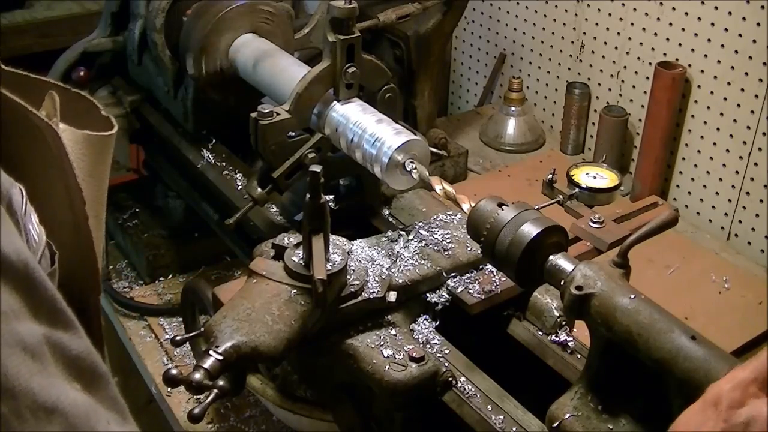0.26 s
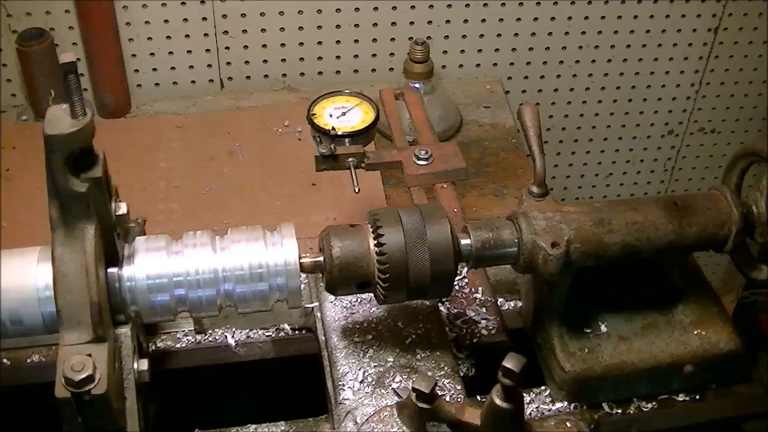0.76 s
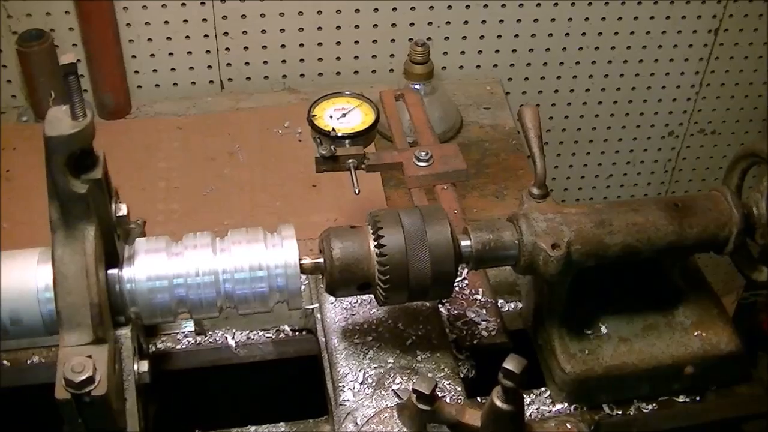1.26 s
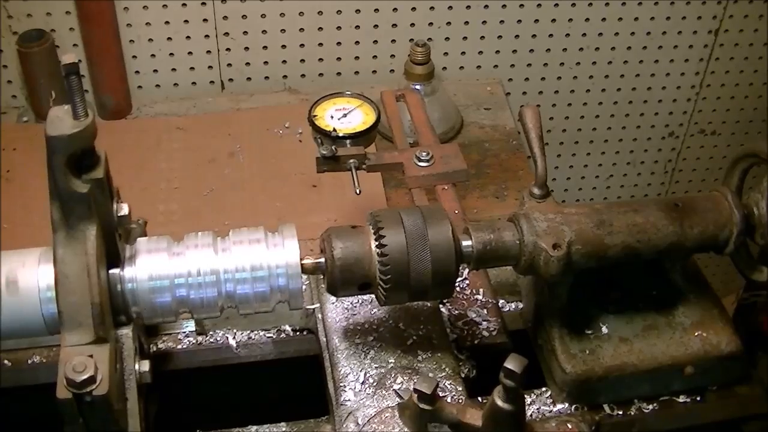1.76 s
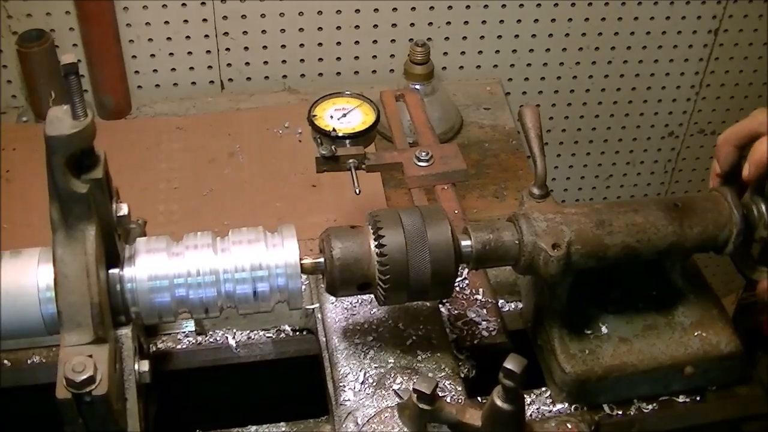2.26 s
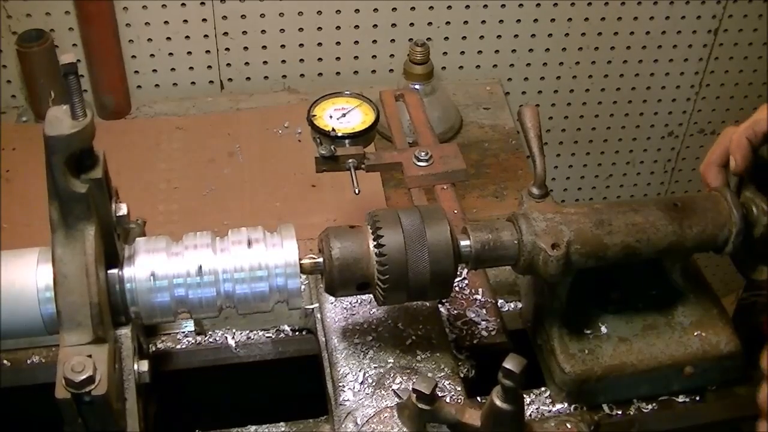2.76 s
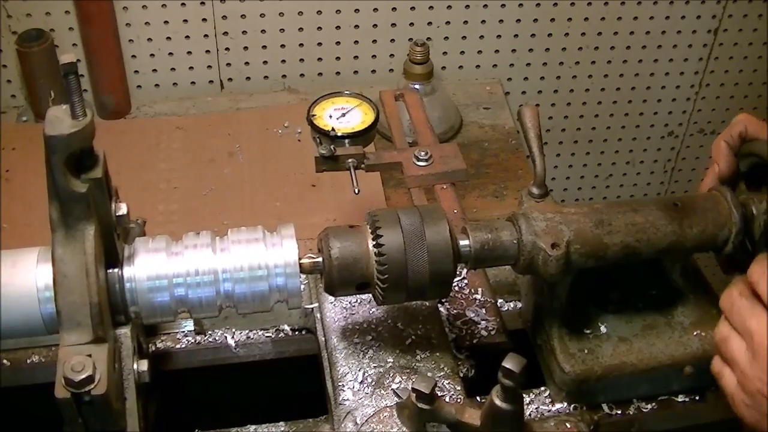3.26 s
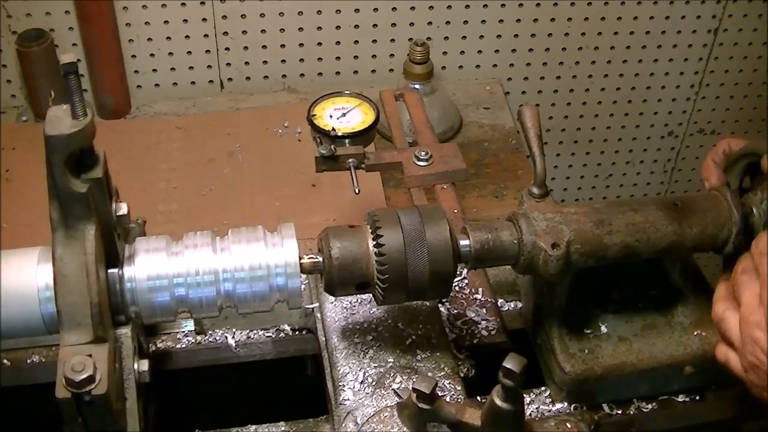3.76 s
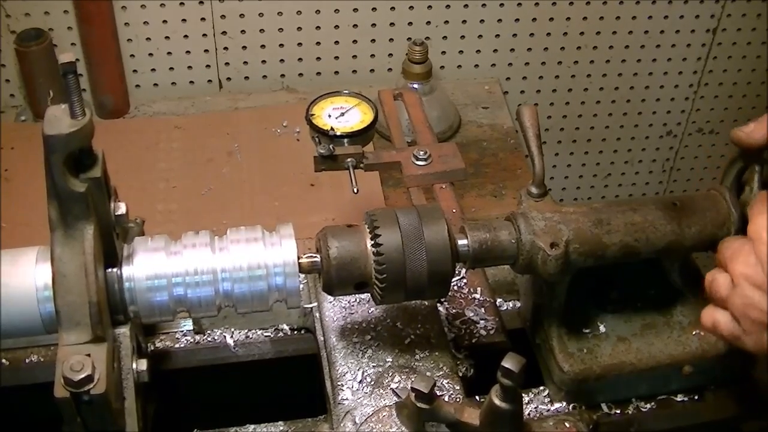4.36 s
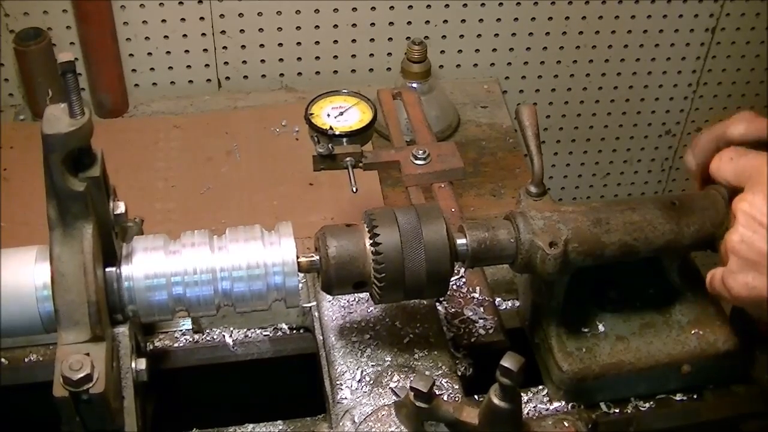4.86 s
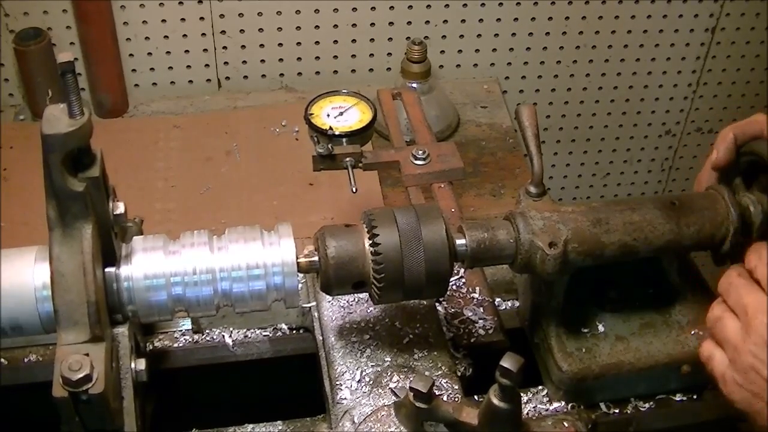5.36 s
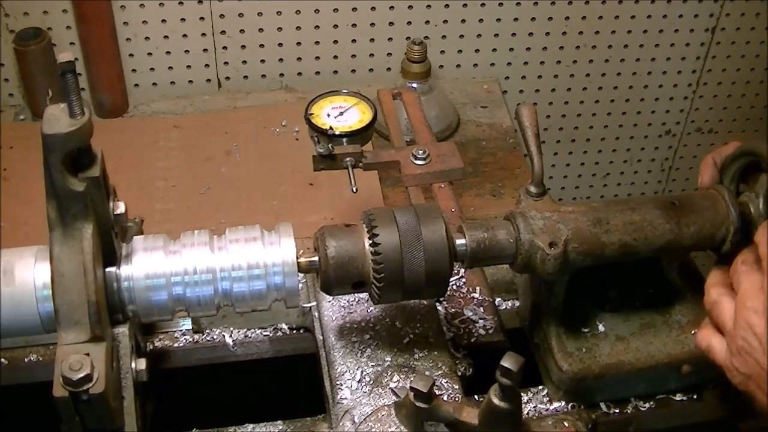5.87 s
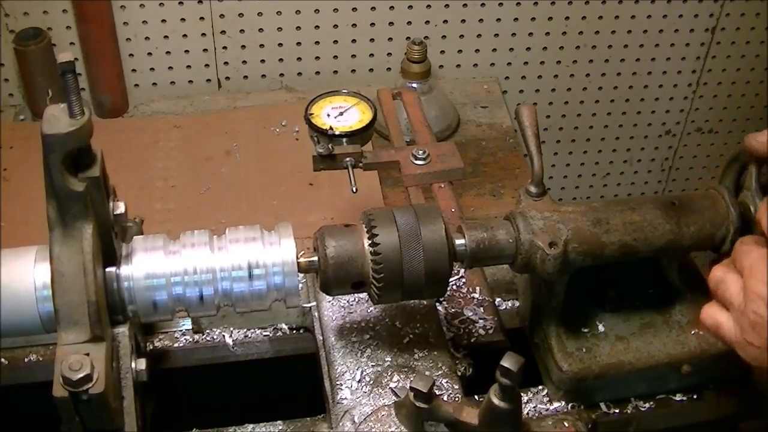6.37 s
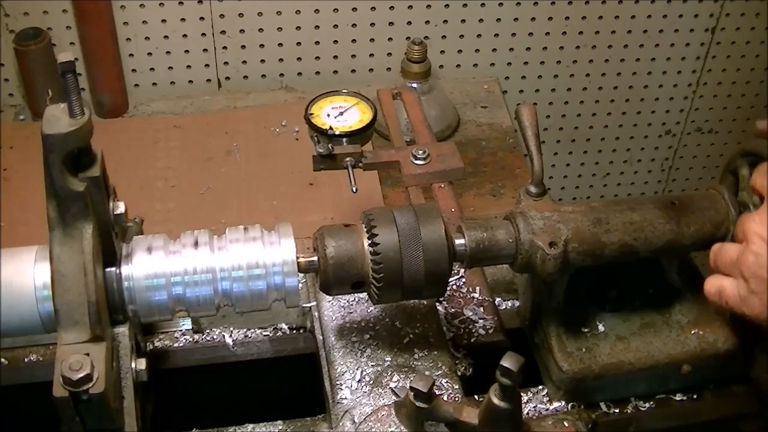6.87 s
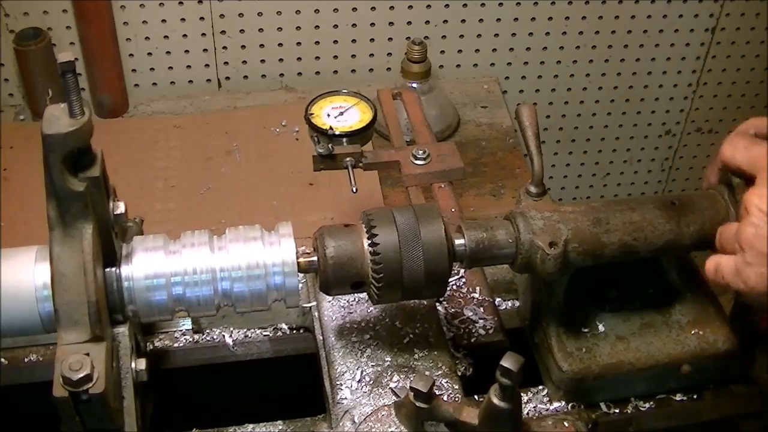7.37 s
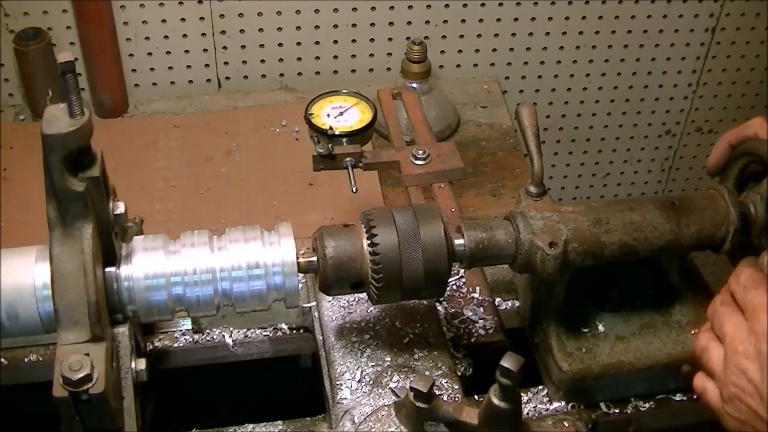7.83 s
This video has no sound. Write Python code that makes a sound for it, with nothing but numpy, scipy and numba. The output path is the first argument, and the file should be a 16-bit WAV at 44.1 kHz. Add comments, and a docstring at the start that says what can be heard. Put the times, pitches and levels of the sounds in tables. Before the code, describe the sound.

First the headstock of a lathe: electrical hum and rattling gears throbbing with each turn. A clean cut leaves a brief silent gap. Then the tailstock: softer motor drone and whirr beneath a constant scatter of very short, shrill squeaks, sliding and uneven, from a drill boring spinning metal. They get louder and harsher as the bit bites, continuing to the end in a small, lightly echoing workshop, closely miked.

```python
"""A drill bit squeaks as it bores a metal bar in an old lathe: gliding near-sines stick, slip and ring in the room.
Two places are heard with a silent pause between. By the headstock, hum tones sit under noise-driven casting
resonances that swell once a turn. By the tailstock, duller gears, a groaning motor, a knock and swarf ticks
lie under the squeaks and their delay-line echo, and a gain control ducks the loud ones."""
import sys
import numpy as np
from scipy import signal
from scipy.fft import rfft, irfft
from scipy.io import wavfile
from scipy.ndimage import uniform_filter1d, minimum_filter1d
from numba import njit

SR = 44100
rng = np.random.default_rng(int(sys.argv[2]) if len(sys.argv) > 2 else 0)


def wrap_up_sound(samples):
    """Save the sound to the file named by the first command line argument, as 16-bit audio."""
    columns = np.atleast_2d(samples).T
    # keep every value between -1 and 1, then stretch to whole-number steps
    tamed = np.clip(columns, -1, 1)
    steps = np.round(tamed * 32767).astype(np.int16)
    wavfile.write(sys.argv[1], SR, steps)


N = 357210

# bit squeaks: [start t/s, length/ms, middle f/Hz, fall in f/Hz, level/dB before gain control]
SQUEAKS = [(1.058, 16, 4900, 81, -5), (1.083, 8.2, 4230, -400, -9), (1.144, 6.7, 7420, 350, -2),
           (1.149, 23, 8330, -42, -7.5), (1.164, 19, 5710, -42, -3.5), (1.18, 24, 8080, 78, -6),
           (1.2178, 10.8, 7830, -170, -5.5), (1.263, 19.7, 3480, 502, -6.5), (1.2939, 11, 6360, 395, -0.5),
           (1.308, 8.5, 6480, -150, 0.5), (1.3288, 13.7, 5230, 993, -3), (1.345, 14.3, 4540, 1276, -8),
           (1.4154, 8.8, 7500, -30, -3), (1.429, 24, 5870, 443, -2), (1.4493, 20, 7520, 1150, -6.5),
           (1.4809, 26, 8050, -200, -4), (1.537, 5.8, 5060, -330, -8.5), (1.5613, 8, 7210, 577, -2),
           (1.597, 19.5, 4860, 797, -4.5), (1.684, 16, 7940, -960, -2), (1.702, 14.6, 5740, 32, -6),
           (1.719, 17, 7520, 1340, -5.5), (1.756, 8.6, 7490, -150, -0.5), (1.784, 11, 4560, -250, -15),
           (1.806, 6.7, 4330, 900, -12.5), (1.8638, 25, 5490, 501, -10), (1.869, 26.4, 4245, 902, -8),
           (1.9026, 6.8, 7320, 1128.5, -4.5), (1.952, 40, 7860, -620, -10.5), (1.968, 25, 5660, 76, -2),
           (1.991, 4.7, 6830, 900, -0.5), (2.027, 24, 7170, -78, -10.5), (2.0728, 10, 4580, 1800, -13),
           (2.1183, 31, 7400, 745, 3), (2.132, 6.5, 5970, 300, -10), (2.16, 11, 4580, 598, -16),
           (2.1507, 9.3, 7700, 248, -0.5), (2.199, 43, 8160, 1100, -8.5), (2.2566, 14, 8750, -40, -11.5),
           (2.269, 26.5, 6360, 783, 1.5), (2.29, 15, 8300, -290, -2), (2.3692, 11, 6460, 1166, -8.5),
           (2.401, 30, 7460, 50, -0.5), (2.4225, 10.6, 7760, -40, 7), (2.441, 3.7, 6340, -220, 3.5),
           (2.5408, 6.8, 6680, 420, 0.5), (2.553, 9, 6400, -180, 3), (2.5687, 4.3, 6340, 287, 13),
           (2.576, 6.7, 5100, 399, -2), (2.627, 14, 6180, 177, -4.5), (2.7154, 10, 5600, -600, -1.5),
           (2.8079, 6.1, 8700, -300, -7), (2.898, 18, 5670, 405, 2), (2.953, 14, 5780, 230, -3.5),
           (2.955, 14, 4830, 1104, -6.5), (2.9991, 8.4, 7440, 680, 3.5), (3.0389, 10, 8000, -40, -0.5),
           (3.05, 9.4, 6510, 221, 4.5), (3.119, 13, 8070, 839, -6.5), (3.1575, 35, 5510, -200, -3.5),
           (3.181, 16.5, 7830, 179, 4), (3.231, 11, 5520, 900, -1), (3.2542, 7.4, 5950, 160, 0),
           (3.2846, 14, 7780, 30, -5.5), (3.3553, 8, 7500, 51, 7.5), (3.379, 12, 5760, 508, -13),
           (3.4304, 6.6, 5500, -240, -3), (3.446, 12.6, 6420, 340, 10), (3.4602, 21, 7860, -25, 7),
           (3.4777, 19, 5500, 489, 2.5), (3.5876, 20.6, 8360, -370, -3.5), (3.6576, 8.1, 6480, 830, -0.5),
           (3.6892, 11, 5800, 26, -9), (3.7232, 12, 6150, -100, 5.5), (3.778, 20.5, 5130, 1000, 1),
           (3.858, 21, 8640, 2, -21), (3.999, 10.7, 6250, 291, 5), (4.0526, 6.9, 6170, 1330, 8.5),
           (4.067, 12, 4730, 403, -10), (4.18, 5, 6400, 518, -12), (4.2214, 13, 8200, 800, -4),
           (4.259, 4.9, 5870, -130, 3), (4.2757, 6.7, 5130, 852, 2), (4.282, 32, 7860, -35, 0),
           (4.302, 25, 5895, 236, 4.5), (4.4174, 10, 8400, -120, -1.5), (4.485, 7, 5100, 900, -4),
           (4.495, 13, 8000, 50, 1.5), (4.563, 27, 8040, 400, -4), (4.6032, 5.8, 6230, 420, 11),
           (4.612, 12, 5170, 298, -6), (4.7724, 7.7, 6500, 900, -12), (4.8262, 12, 5350, 209, 1.5),
           (4.8355, 16.4, 7740, 322, 3), (4.8673, 8.3, 5890, 110, 5.5), (4.876, 12.5, 5170, 902, -3.5),
           (4.9146, 5.9, 6310, -450, 4), (5.0057, 7.8, 7820, -400, -10.5), (5.051, 15, 5720, 1000, -5),
           (5.0585, 21, 4510, 497.5, -10), (5.091, 5.5, 5280, 360, -3), (5.096, 30, 5930, -300, 1),
           (5.109, 17, 7100, 294, 7), (5.137, 6.7, 7280, 330, 1), (5.138, 10.5, 4860, 900, -9.5),
           (5.1773, 7.4, 8100, 40, -8), (5.188, 8.6, 6350, -80, 2.5), (5.239, 7.6, 6980, 415, 6.5),
           (5.278, 9, 7900, 100, -18), (5.3164, 8.6, 7080, 1100, -6.5), (5.353, 11.5, 4860, -210, -8),
           (5.373, 11.7, 5380, -64, -0.5), (5.388, 15, 7700, 100, -2.5), (5.3868, 9.1, 6290, -220, 3.5),
           (5.403, 32, 5950, 697, 3), (5.5148, 44, 7600, -1200, 6), (5.618, 9.6, 6100, 500, -11.5),
           (5.7059, 9.4, 5810, 1308.5, 0.5), (5.747, 10.4, 6600, 182, 9.5), (5.803, 22.6, 7660, 46, 6.5),
           (5.831, 8, 8180, -30, 4), (5.864, 6.5, 6500, 200, -9), (5.874, 19, 10480, 98, -14),
           (5.932, 2.8, 6100, 542, -6), (5.962, 9.6, 7550, 369, -7), (5.9896, 19.5, 5795, 27, -7.5),
           (6.08, 12.6, 6200, 308, -7), (6.1345, 7, 6240, -320, 9), (6.163, 3.7, 4090, 310, 0.5),
           (6.2028, 8.9, 7600, 85, 1.5), (6.2056, 9.3, 6240, 26, 11.5), (6.249, 15, 6020, 300, 0.5),
           (6.263, 11, 5320, 901, -7), (6.321, 30, 8070, 471, -9.5), (6.344, 10.4, 7930, 535, -0.5),
           (6.402, 13, 5850, -140, 0), (6.424, 7.1, 7190, 364, 1), (6.465, 17.4, 4950, -600, -6.5),
           (6.479, 11.5, 8190, 370, -7.5), (6.544, 9.9, 4885, 162, 1), (6.622, 29, 6930, 242, -17.5),
           (6.689, 7, 7540, 1368, -1), (6.828, 20, 5435, 8, -4.5), (6.9398, 8.4, 9140, 100, 1.5),
           (7.064, 6.9, 7500, 833, 7.5), (7.1055, 11.7, 5740, 500, -2.5), (7.1855, 27, 8490, -47, -6),
           (7.212, 31, 8110, 1552, -9), (7.225, 8.3, 6450, 1000, -6), (7.377, 15, 5680, 70, -6),
           (7.433, 53, 8390, -150, -5), (7.4964, 9.3, 7300, 2100, 3), (7.679, 11, 6600, -900, 4),
           (7.728, 12.7, 7440, 1591, 4.5), (7.764, 16, 8400, -600, -14), (7.8232, 11.6, 5510, 1500, -6),
           (7.928, 16.4, 4800, 900, -17.5), (8.015, 15, 7400, -200, -12), (8.025, 9.1, 7540, -350, 2.5),
           (8.0433, 7.1, 7980, -520, -2), (8.068, 7.7, 8900, 601.5, -12)]
# how hard the bit bites: [t/s, load 0-1]
LOAD = [(2.2, 0.25), (2.7, 0.95)]
# silence between the two places: [start t/s, end t/s]
PAUSE_S = (.6595, 1.052)
# motor hum by the headstock: [f/Hz, level/dB rms]
HUM_NEAR = [(120, -21), (240, -33.5)]
# motor hum by the tailstock: [f/Hz, level/dB rms before gain control]
HUM_FAR = [(119.95, -20), (479.8, -41)]
# gearbox casting resonances at each place: [f/Hz, width/Hz, relative level/dB]
CASTING_NEAR = [(381, 65, -7.5), (486.5, 17, 4), (782, 55, -8), (1110, 27, -13), (1330, 19, -7.5),
                (2410, 79, -17), (2715, 28, -12.5), (3340, 50, -22), (3890, 170, -24.5), (4370, 270, -22.5),
                (7190, 500, -27), (10000, 800, -24), (12600, 900, -24)]
CASTING_FAR = [(507.7, 38.5, 2.5), (806, 122, -8.5), (1224, 77, -7.5), (2077, 147, -11.5),
               (2760, 112, -12.5), (3286, 260, -15)]
# tight spots in the gears, met again every turn: [t/s, low-mode lift/dB, high-mode lift/dB]
TIGHT_SPOTS = [(0.17, -3, 11.5), (0.243, 4.5, 8), (0.29, 3, 4.5)]
# small knocks in the running machine: [t/s, envelope level/dB before gain control]
KNOCKS = [(6.728, -27)]
# spectrum of the broad whirr at each place: [f/Hz, relative level/dB]
WHIRR_NEAR = [(25, -64), (120, -21), (480, -17), (2500, -25.5), (6000, -43.5), (12500, -48), (16000, -62.5)]
WHIRR_FAR = [(25, -48), (120, -10), (500, -17), (1600, -21), (5000, -26), (11000, -32), (16000, -54)]
# base strength of a squeak's overtone by its own pitch: [f/Hz, level/dB]
OVERTONE = [(6000, 2.5), (11000, -10.5), (13500, -20), (16000, -30)]

TURN_HZ, TURN_PEAK_S = 3.76, 0.24  # spindle turns per second, moment of the swell
TIGHT_S, HIGH_MODES_HZ = 0.011, 2000  # width of a tight spot, split between low and high modes
KNOCK_S, KNOCK_HZ, KNOCK_WIDTH_HZ = 0.013, 1500, 2800  # decay time, resonance and its width
BUILD_FROM, BUILD_SHARE = 0.78, 0.25  # a slip starts at part strength and builds over this share of its length
STEADY_ROUGH, ROUGH_FALL_HZ = 0.43, 514  # roughness of a steady squeak, glide that adds 1 to it
GLIDE_BEND = 0.55  # under 1: the pitch moves fastest at the start of a slip
# gain control: start and top gain, climb time, ceiling, attack time, peak window, gain smoothing
START_DB, TOP_DB, CLIMB_S = -9.5, -0.5, 0.37
CEILING_DB, ATTACK_S, PEAK_HOLD_S, GAIN_SLEW_S = -9.5, 0.0016, 0.0015, 0.004
LOW_CUT_HZ, TOP_HZ = 20, 16000


def undb(db):
    """dB to gain."""
    return 10 ** (np.asarray(db) / 20)


def level(x, db):
    """Scale to an rms level in dB."""
    return x * undb(db) / np.sqrt(np.mean(x ** 2))


def walk(rate):
    """Random values held for 1 / rate s and smoothed twice; spread about 0.6."""
    hold = int(SR / rate)
    steps = np.repeat(rng.standard_normal(N // hold + 1), hold)
    return 0.83 * uniform_filter1d(uniform_filter1d(steps, hold), hold)[:N]


def spectrum_db(points, hz):
    """Straight lines between (f/Hz, level/dB) points on a log-frequency axis."""
    point_hz, point_db = np.array(points).T
    return np.interp(np.log(hz), np.log(point_hz), point_db)


def bin_hz():
    """Frequencies of the spectrum bins, kept above zero."""
    return np.maximum(np.fft.rfftfreq(N, 1 / SR), 1)


def tint(x, points):
    """Shape noise by a smooth spectrum."""
    return irfft(rfft(x) * undb(spectrum_db(points, bin_hz())), N)


def resonate(x, modes):
    """Ring a bank of resonances of alternating sign."""
    hz, gain = bin_hz(), 0
    for k, (f, width, db) in enumerate(modes):
        gain = gain + (-1) ** k * undb(db) / (1 + 1j * (hz - f * f / hz) / width)
    gain = gain / (1 + (hz / 7000) ** 2)  # heavy iron swallows the treble
    return irfft(rfft(x) * gain, N)


def lathe(hum, casting, whirr, gear_db, whirr_db, throb_db, tooth_db, load_db=0, spots=()):
    """Hum tones; ragged noise for gear teeth rings the casting and throbs each turn; belts and air whirr."""
    t = np.arange(N) / SR
    tones = sum(np.sqrt(2) * undb(db + 0.5 * walk(1.9)) * np.sin(2 * np.pi * hz * t) for hz, db in hum)
    throb = throb_db * np.cos(2 * np.pi * TURN_HZ * (t - TURN_PEAK_S))
    teeth = rng.standard_normal(N) * undb(tooth_db * walk(300) + 3 * walk(15) + throb)
    air = rng.standard_normal(N) * undb(3.9 * walk(40) + 1.1 * throb)
    gears = 0
    for high in (0, 1):  # low modes, then high modes
        lift_db = 0
        for spot in spots:
            away = np.sin(np.pi * TURN_HZ * (t - spot[0])) / (np.pi * TURN_HZ * TIGHT_S)
            lift_db = lift_db + spot[1 + high] * np.exp(-away ** 2)
        modes = [m for m in casting if (m[0] > HIGH_MODES_HZ) == high]
        gears = gears + resonate(teeth * undb(lift_db), modes)
    running = level(gears, gear_db) + level(tint(air, whirr), whirr_db)
    return tones + undb(load_db) * running


def loaded_motor(t, load):
    """Running light the motor hums its octave; under load that fades and the frame groans in fits."""
    octave = undb(-39.5 - 5.0 * load) * np.sin(2 * np.pi * 239.9 * t)
    fits = rng.standard_normal(N) * undb(2.0 * walk(6.7))
    groan = resonate(fits, [(296.4, 11.0, 0)])
    return octave + load * level(groan, -37.0)


def knocks():
    """Short dull rattling blows: decaying bursts of broadly resonant noise."""
    t = np.arange(N) / SR
    blows = sum(undb(db) * (t >= s) * np.exp(-np.abs(t - s) / KNOCK_S) for s, db in KNOCKS)
    rattle = resonate(rng.standard_normal(N), [(KNOCK_HZ, KNOCK_WIDTH_HZ, 0)])
    return blows * level(rattle, 0)


def chips(count, db):
    """Swarf ticks on the bed: tiny bright decaying noise clicks at random moments."""
    when, size = rng.random((count, 2)).T
    ticks = np.zeros(N)
    ticks[(when * N).astype(int)] = undb(db - 16 * size)
    shake = signal.lfilter([1], [1, -0.97], ticks) * rng.standard_normal(N)
    return resonate(shake, [(12600, 6600, 11)])


def glides():
    """The squeaks as rows of start t/s, length/ms, start f/Hz, end f/Hz, level/dB."""
    s, ms, hz, fall_hz, db = np.transpose(SQUEAKS)
    return np.transpose([s, ms, hz + fall_hz / 2, hz - fall_hz / 2, db])


def after_slips(count, weaker_db, lowest):
    """The bit often catches again just after a squeak: fainter, mostly lower, sliding down."""
    chance = rng.random((count, 5)).T
    parent = (chance[0] * len(SQUEAKS)).astype(int)
    s, ms, hz, _, db = np.array(SQUEAKS)[parent].T
    start = s + ms / 1000 + 0.07 * chance[2] ** 4
    length_ms = 4 + 8.7 * chance[3]
    pitch = hz * (lowest + (1.1 - lowest) * chance[1])
    return np.transpose([start, length_ms, pitch, 0.88 * pitch, db - weaker_db - 23.0 * chance[4]])


def squeaks(slips, rise_s, sag_db, grip_db, wobble, rasp_db, snap_db, snap_s, third_db):
    """Each slip is a near-sine that glides and sags unevenly, with overtones, a rasp and a snap as it breaks free."""
    out, drift = np.zeros(N), wobble * walk(500)
    grip = -grip_db * walk(300) ** 2
    rasp = undb(rasp_db) * walk(1400)
    grit = np.gradient(rng.standard_normal(N))
    for (s, ms, hz0, hz1, db), (start, bright, sharp) in zip(slips, rng.random((len(slips), 3))):
        i = np.arange(min(int(s * SR), N - 1), min(int((s + ms / 1000) * SR) + 1, N))
        share, t = np.linspace(0, 1, len(i)), (i - i[0]) / SR
        rough = np.clip(STEADY_ROUGH + abs(hz1 - hz0) / ROUGH_FALL_HZ, 0, 1.3)  # steady squeals ring purer
        hz = (hz0 + (hz1 - hz0) * share ** GLIDE_BEND) * (1 + rough * drift[i])
        phase = 2 * np.pi * (start + np.cumsum(hz) / SR)
        rise = np.sin(np.pi / 2 * np.clip(t / (rise_s + 0.014 * t[-1]), 0, 1)) ** 2
        rise = rise * np.minimum(BUILD_FROM + (1 - BUILD_FROM) * share / BUILD_SHARE, 1)
        fall = np.sqrt(1 - share ** 4) * undb((grip[i] - sag_db) * share)
        tone = np.sin(phase)
        for k, extra_db in ((2, 0), (3, third_db)):
            over = undb(spectrum_db(OVERTONE, k * hz) + extra_db + 4.5 - 18.5 * bright)
            tone = tone + over * np.sin(k * phase) * (k * hz < SR / 2)  # nothing above half the sample rate
        snap = undb(snap_db - 13 * sharp) * grit[i] * np.exp(-t / snap_s)
        out[i] += undb(db) * rise * (fall * (1 + rough * rasp[i]) * tone + snap)
    return out


@njit
def walls(x, lags, gain, damp):
    """Room echo: eight delay lines that feed each other, duller on every round."""
    line, soft, out = np.zeros((8, 4096)), np.zeros(8), np.zeros(len(x))
    for i in range(len(x)):
        total = 0.
        for k in range(8):
            soft[k] += (1 - damp) * (gain[k] * line[k, (i - lags[k]) & 4095] - soft[k])
            total += soft[k]
            out[i] += soft[k] * (1 - 2 * (k % 2))
        for k in range(8):
            line[k, i & 4095] = x[i] + soft[k] - total / 4
    return out


@njit
def ride(over_db, first, start_db, top_db, climb, attack):
    """Gain in dB: creeps towards its top, and sinks towards the ceiling while the sound is over it."""
    gain_db, g = np.full(len(over_db), start_db), start_db
    for i in range(first, len(over_db)):
        g += climb * (top_db - g) - attack * max(over_db[i] + g, 0.)
        gain_db[i] = g
    return gain_db


def gain_control(x):
    """Pull loud peaks down within a few ms and let the level creep back."""
    peak = -minimum_filter1d(-np.abs(x), max(int(PEAK_HOLD_S * SR), 1))
    over_db = 20 * np.log10(peak + 1e-9) - CEILING_DB
    first = int(PAUSE_S[1] * SR)
    gain_db = ride(over_db, first, 1. * START_DB, 1. * TOP_DB, 1 / (CLIMB_S * SR), 1 / (ATTACK_S * SR))
    return x * undb(uniform_filter1d(gain_db, max(int(GAIN_SLEW_S * SR), 1)))


def scene():
    """The headstock place, a pause, then the tailstock place with the squeaks and their room tail."""
    t = np.arange(N) / SR
    load = np.interp(t, *np.transpose(LOAD))
    near = lathe(HUM_NEAR, CASTING_NEAR, WHIRR_NEAR, gear_db=-23.0, whirr_db=-27.5, throb_db=2.5, tooth_db=5,
                 spots=TIGHT_SPOTS)
    far = lathe(HUM_FAR, CASTING_FAR, WHIRR_FAR, gear_db=-31.5, whirr_db=-32.0, throb_db=-0.16, tooth_db=4.0,
                load_db=4.0 * (load - 1))
    machine = far + loaded_motor(t, load) + knocks() + chips(count=80, db=-20)
    slips = np.vstack([glides(), after_slips(count=360, weaker_db=17, lowest=0.78)])
    bit = squeaks(slips, rise_s=0.001, sag_db=3, grip_db=2.5, wobble=0.04, rasp_db=-5.5, snap_db=-23,
                  snap_s=0.0058, third_db=-4.5)
    lags = (211 * 1.351 ** np.arange(8)).astype(np.int64)  # samples
    round_gain = undb(-60 * lags / SR / 0.28)  # 60 dB down in 0.28 s, before the damping
    room = walls(bit + 1e-18, lags, round_gain, 0.16)
    tailstock = gain_control(machine + bit + undb(-18.0) * room)
    return (near * (t < PAUSE_S[0]) + tailstock * (t > PAUSE_S[1]))[None]


def record(dry):
    """Thin the deepest bass, round the loudest peaks by soft saturation and cut the top of the band."""
    thin = signal.sosfilt(signal.butter(1, LOW_CUT_HZ, "high", fs=SR, output="sos"), dry)
    rounded = np.tanh(1.239 * thin) / 0.98
    return signal.sosfilt(signal.ellip(10, 0.2, 90, TOP_HZ, fs=SR, output="sos"), rounded)


dry = scene()
out = record(dry)
wrap_up_sound(out)
```